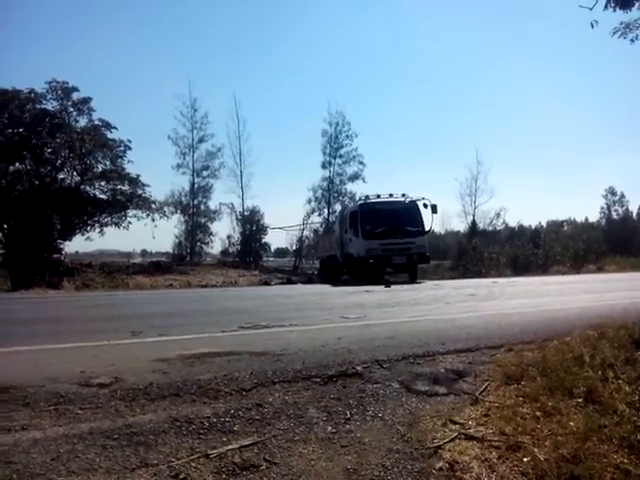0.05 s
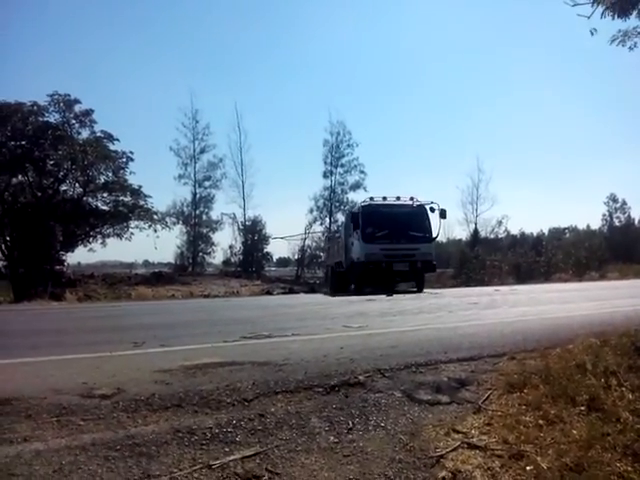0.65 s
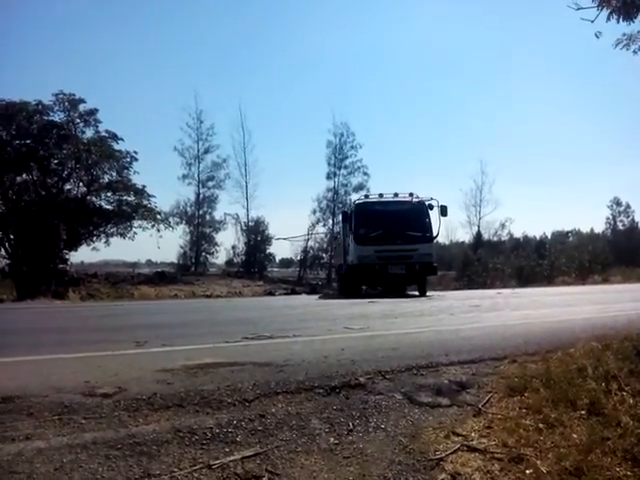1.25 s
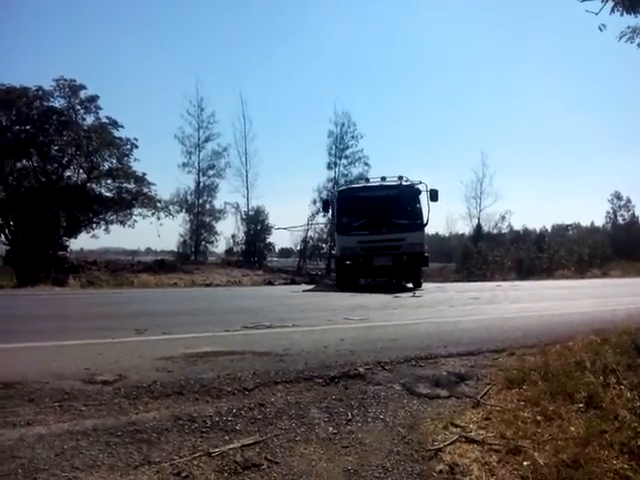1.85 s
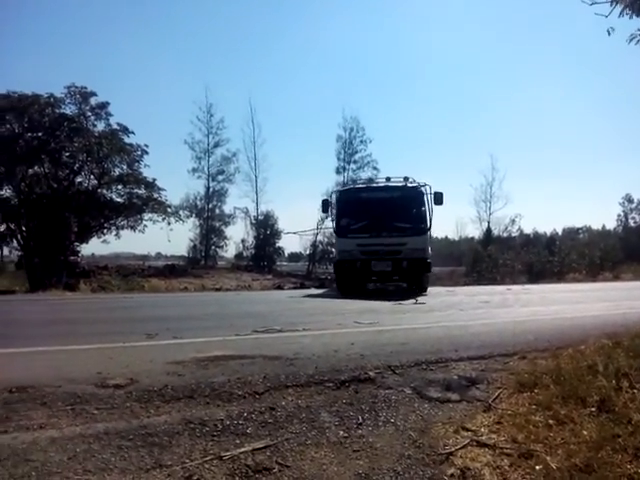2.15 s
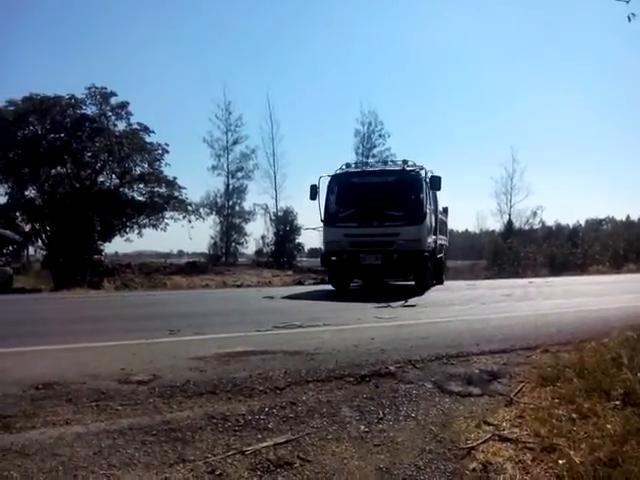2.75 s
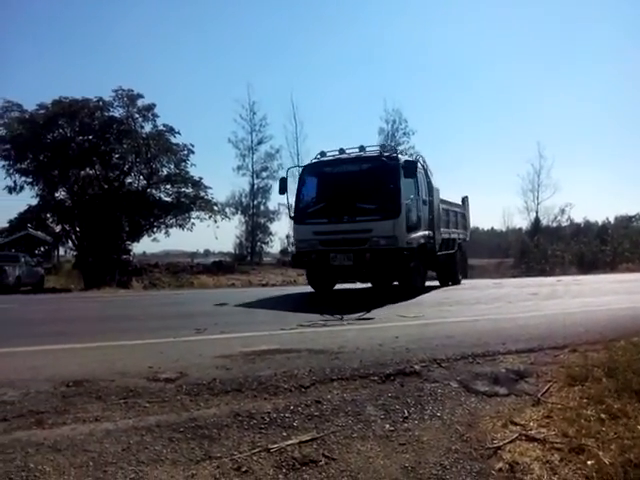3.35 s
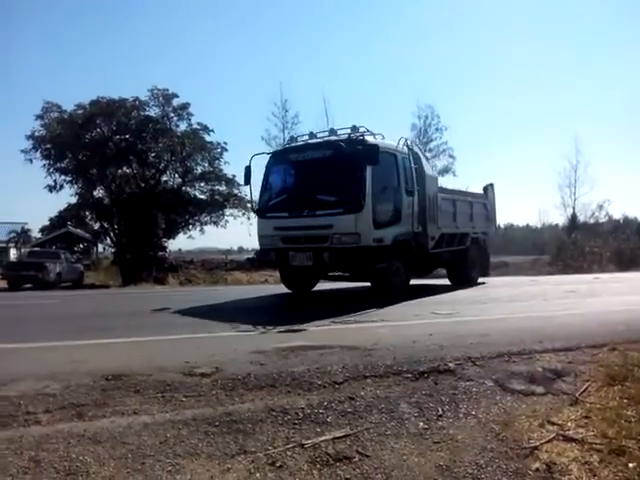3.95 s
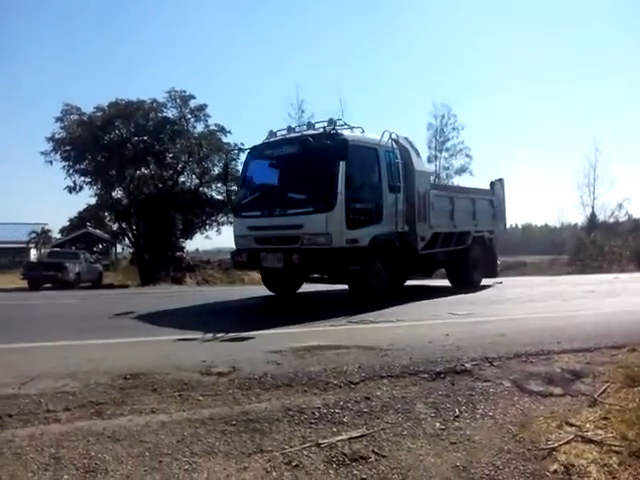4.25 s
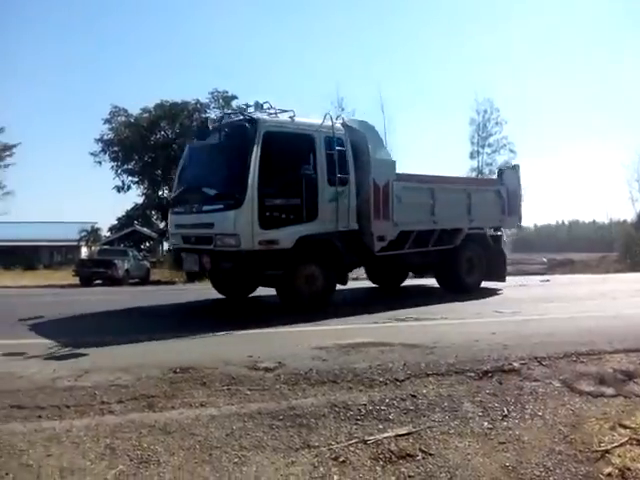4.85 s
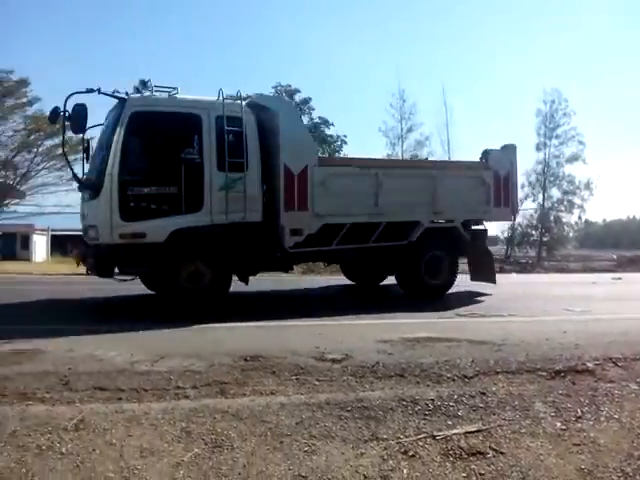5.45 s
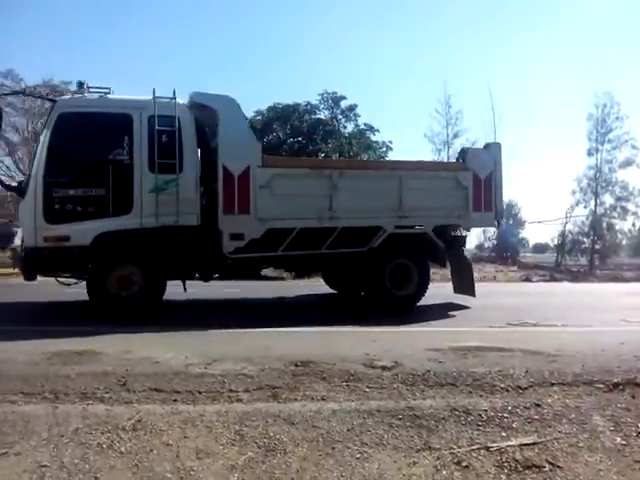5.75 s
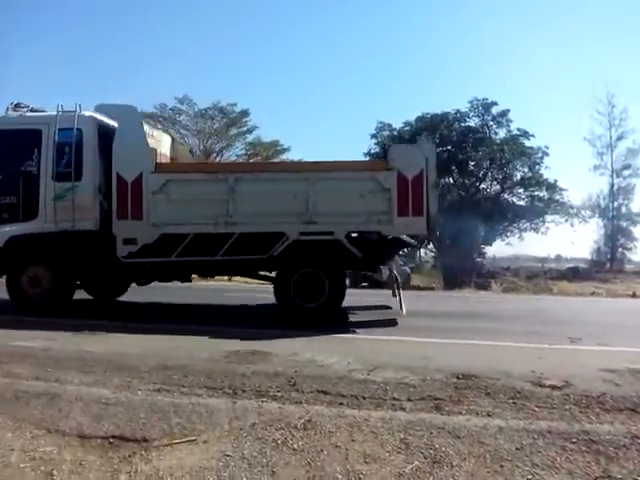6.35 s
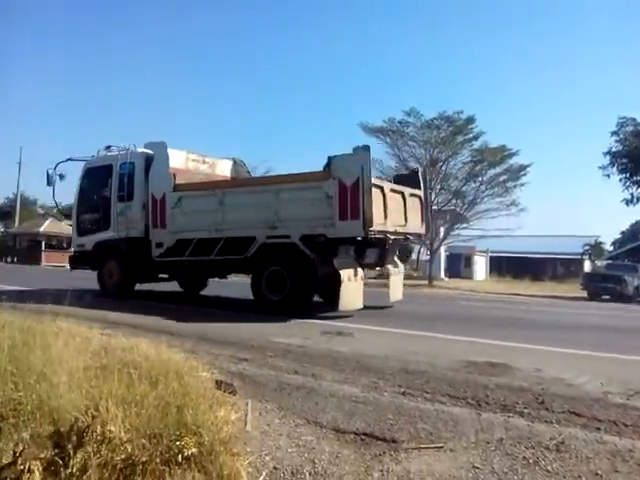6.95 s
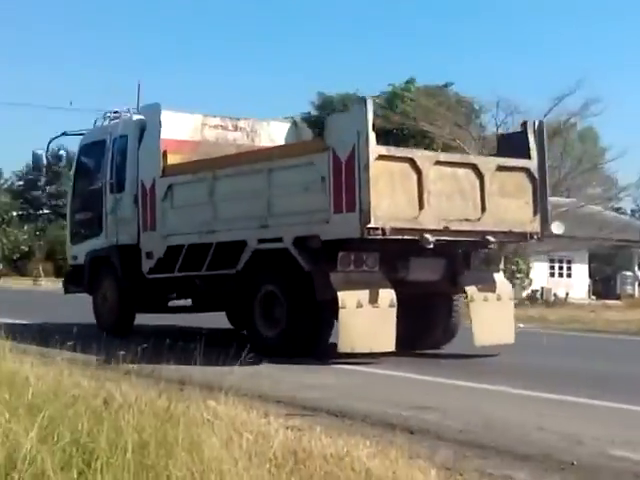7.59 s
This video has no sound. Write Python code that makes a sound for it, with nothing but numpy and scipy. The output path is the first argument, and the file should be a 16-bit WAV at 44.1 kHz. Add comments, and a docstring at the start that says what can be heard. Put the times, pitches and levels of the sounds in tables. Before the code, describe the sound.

Heard from the roadside, a heavy truck approaches, its diesel engine droning and knocking while its steel body clinks now and then. The pitch rises slowly and sinks during a gear change. The exhaust then thumps and growls as the truck accelerates loudly past, a few metres from the microphone. As its tail goes by, the exhaust hisses, the rear gears whine and the revs fall.

```python
"""A six-cylinder diesel dump truck pulls away, changes gear at about 4 s and accelerates past a stereo
microphone on the verge, 4.5 m from the lane. Firings drone through the exhaust, uneven cylinders make
the pipe throb, combustion knocks clatter once a firing and loose steel clinks on the tipper body. Hard
firings boom and the silencer barks as the load comes on. As the tail goes by, gas hisses from the outlet
and the rear gears whine. The loudest peaks clip at full scale."""
import sys
import numpy as np
from scipy import signal
from scipy.fft import rfft, irfft
from scipy.io import wavfile
from scipy.ndimage import uniform_filter1d

SR = 44100
rng = np.random.default_rng(int(sys.argv[2]) if len(sys.argv) > 2 else 0)


def to_wav(sig):
    """Store sig (one row per channel, or 1-D mono) as 16-bit WAV at the path in sys.argv[1].

    Samples outside -1..1 are clipped; the rate is SR.
    """
    pcm = np.clip(np.atleast_2d(sig), -1, 1) * 32767
    pcm = np.round(pcm).astype(np.int16)
    wavfile.write(sys.argv[1], SR, pcm.T)  # frames by channels


N = 336042
T = np.arange(N) / SR
HZ = np.maximum(np.fft.rfftfreq(N, 1 / SR), 1)

# engine speed as firing rate: t/s, f/Hz
FIRING_RATE = [(0, 42.4), (.35, 41.6), (.55, 44.27), (1, 46.92), (2, 47), (2.5, 50.55), (3.42, 63.63),
               (3.55, 58.5), (3.75, 52.27), (4.08, 39.25), (4.3, 41.65), (4.8, 40.66), (5.72, 58.96),
               (6, 67.78), (6.6, 85.28), (6.8, 89.73), (7.15, 70.98), (7.62, 56.2)]
# strength of the exhaust: t/s, drone base level/dB, throb level/dB
EXHAUST_LEVELS = [(0, -16.5, -25), (.3, -22.5, -24.5), (.55, -17.5, -21), (1.5, -16.5, -19),
                  (2.05, -14.3, -18), (2.75, -8.5, -24.5), (3.45, -7.5, -20), (3.75, -11.5, -24),
                  (4, -19, -27.5), (4.35, -9, -17.5), (4.8, -16, -17), (5.05, -10, -14.5), (5.85, -4, -22),
                  (6.3, -4, -13), (6.78, -8, -12), (6.92, -17.5, -12), (7.3, -16, -18), (7.62, -19, -17)]
# exhaust pipe resonances: f/Hz, width/Hz, level/dB
PIPE_MODES = [(109.96, 8.5, 1), (207.4, 5.8, -7.5), (271, 7, -16.5), (338, 19, -22), (362, 11, -27.5)]
# silencer shell resonances: f/Hz, width/Hz, level/dB
SHELL_MODES = [(400.6, 30, 8), (492, 31, 0.5), (621, 37, 5), (710, 35, -30), (880, 68, -41)]
# spectrum of drumming panels: f/Hz, level/dB
PANEL_SPECTRUM = [(280, -8), (375, 1.5), (440, -6), (530, -3), (620, 1), (720, -0.5), (820, 2), (920, -7),
                  (1060, -13.5), (1400, -8.5), (2500, -45)]
# spectrum of fine spray, from injectors or gas jet: f/Hz, level/dB
FIZZ_SPECTRUM = [(3000, -23.5), (4200, 3.5), (5000, 5), (5700, 1.5), (6700, 0), (7400, -6.5), (7900, -26),
                 (8600, -39.5)]
# stereo width at the microphone for all but the gas jet: f/Hz, side minus mid/dB
FRONT_WIDTH = [(100, -32.5), (300, -19), (900, -15.5), (1600, -16), (2700, -9), (3800, -4), (5000, 3),
               (7500, 7.5)]


def undb(db):
    """Decibels to gain."""
    return 10 ** (np.asarray(db) / 20)


def unit(x):
    """Scale to rms 1."""
    return x / np.std(x)


def curves(table):
    """The columns of a table, joined by straight lines in time."""
    s, *columns = np.transpose(table)
    return [np.interp(T, s, c) for c in columns]


def response(points):
    """Gain per frequency from points of f/Hz, level/dB."""
    hz, db = np.transpose(points)
    return undb(np.interp(np.log(HZ), np.log(hz), db))


def colour(x, gain):
    """Minimum-phase filter with the given gain per frequency."""
    cepstrum = irfft(np.log(gain + 1e-6), N)
    cepstrum[1:N // 2] *= 2
    cepstrum[N // 2 + 1:] = 0
    impulse = irfft(np.exp(rfft(cepstrum)), N)[:N // 16]
    return signal.fftconvolve(x, impulse)[:N]


def noise():
    """White noise."""
    return rng.standard_normal(N)


def wander(rate_hz):
    """Smooth random drift of spread 1."""
    return unit(irfft(rfft(noise()) / (1 + (HZ / rate_hz) ** 4), N))


def steady(x, span_s=.23):
    """Hold the running rms at 1."""
    return x / np.sqrt(uniform_filter1d(x * x, int(span_s * SR)) + 1e-4 * np.var(x))


def strikes(times, sizes):
    """Single pushes at the given times."""
    x = np.zeros(N)
    np.add.at(x, np.clip(np.asarray(times) * SR, 0, N - 1).astype(int), sizes)
    return x


def fade(x, decay_s):
    """Give each push an exponential tail."""
    return signal.lfilter([1], [1, -np.exp(-1 / (decay_s * SR))], x)


def ring(pushes, modes):
    """Damped resonances ring after each push."""
    t = T[:SR // 2]
    tail = sum(undb(db) * np.exp(-np.pi * width * t) * np.sin(2 * np.pi * hz * t)
               for hz, width, db in modes)
    return signal.fftconvolve(pushes, tail)[:N]


def puffs(fired, depth, decay_s, scatter_db):
    """Envelope that surges at every firing."""
    sizes = undb(scatter_db * rng.standard_normal(len(fired)))
    surge = fade(strikes(fired, sizes), decay_s)
    depth = np.clip(depth, 0, 1)
    return steady(1 - depth + depth * steady(surge))


def swell(peak_s, peak_db, rise_db_per_s, fall_db_per_s):
    """Level in dB that climbs and sinks as a source sweeps past the microphone."""
    return peak_db - np.maximum(rise_db_per_s * (peak_s - T), fall_db_per_s * (T - peak_s))


def ports(source, width, direct):
    """Direct sound reaches the microphone's left port first; scattered sound differs between ports."""
    mid = source()
    difference = 1j * np.sqrt(direct) * rfft(mid) + np.sqrt(1 - direct) * rfft(source())
    side = irfft(difference * response(width), N)
    return np.array([mid + side, mid - side])


def pedal(travel_s=.091):
    """Depth of the accelerator, 0-1."""
    # one press for each gear: start/s, end/s, depth/0-1
    presses = [(.35, 3.5, .65), (4.85, 6.8, 1)]
    return sum(depth * np.clip(np.minimum(T - start, end - T) / travel_s + .5, 0, 1)
               for start, end, depth in presses)


def nearness(nearest_s=6.36, speed_m_s=5.83, lane_m=4.5):
    """Lane distance over the engine's distance from the microphone: 1 as it passes."""
    return lane_m / np.hypot(lane_m, speed_m_s * (T - nearest_s))


def outlet_in_view(turn_s=(5.91, 6.56)):
    """0 while the cab hides the exhaust outlet from the microphone, 1 once it is in view."""
    return np.interp(T, turn_s, [0, 1])


def exhaust_drone(crank, rate, jitter_cycles=.007, waver_db=.45, outlet_lift_share=.23):
    """Harmonics of the firing rate swell as they cross the pipe's resonances."""
    # harmonics from the first up: level in front/dB, level facing the outlet/dB, full-throttle gain/dB
    harmonics = [(-4, -3.5, 4), (0.5, -9, 1.5), (-11, -2, 0), (-18, -25.5, 16), (-13, -37.5, 8)]
    # how the pipe lifts a harmonic that sweeps through it: f/Hz, gain/dB
    pipe_lift = [(42, -19), (48, -25.5), (60, -21.5), (80, -11), (95, -2.5), (112, -1), (138, -2.5),
                 (160, -3.5), (185, -10.5), (207, -2.5), (222, -3.5), (238, -18.5), (280, -18),
                 (440, -28.5)]
    lift_hz, lift_db = np.transpose(pipe_lift)
    base_db, _ = curves(EXHAUST_LEVELS)
    rear, full_throttle = outlet_in_view(), pedal() ** 4
    unsteady_crank = crank + jitter_cycles * wander(51)
    drone = 0
    for k, (front_db, rear_db, throttle_db) in enumerate(harmonics, 1):
        hz = k * rate
        lift = np.interp(np.log(hz), np.log(lift_hz), lift_db)
        db = base_db + full_throttle * throttle_db
        db += (1 - rear) * (front_db + lift) + rear * (rear_db + outlet_lift_share * lift)
        db += waver_db * (k / 2) ** 2 * wander(20)
        pipe_shift = hz * (hz - 80) / 270 ** 2  # phase in cycles
        drone += undb(db) * np.cos(2 * np.pi * (k * unsteady_crank + pipe_shift))
    return np.sqrt(2) * drone


def exhaust_throb(fired, load, pulling_scatter=.045, stumble=.39, outlet_scatter=.11):
    """The differences between cylinders ring the pipe and burble at the outlet."""
    # relative surplus push of each cylinder in firing order: into the pipe, at the outlet
    cylinders = [(0.37, 0.69), (0.19, -0.14), (-0.041, 0.33), (0.17, 0.57), (-0.022, 0.081), (-0.044, -0.2)]
    # the silencer passes little above its cut-off: f/Hz, gain/dB
    silencer = [(380, -4.5), (460, -16), (900, -26)]
    # spectrum of the burble at the outlet: f/Hz, level/dB
    burble_spectrum = [(28, -59), (48, -23.5), (80, -1), (135, 15), (185, 2), (240, 1), (325, 0),
                       (390, -19), (470, -36), (900, -71.5)]
    firing_order = np.arange(1, len(fired) + 1) % len(cylinders)
    surplus = (cylinders - np.mean(cylinders, axis=0))[firing_order]
    chance = rng.standard_normal((len(fired), 2))
    # off the throttle the firings stumble
    scatter = np.where(np.interp(fired, T, load) > .1, pulling_scatter, stumble)
    pipe_pushes = strikes(fired, surplus[:, 0] + scatter * chance[:, 0]) + .0028 * noise()
    outlet_pushes = strikes(fired, surplus[:, 1] + outlet_scatter * chance[:, 1]) + .01 * noise()
    pipe = steady(colour(ring(pipe_pushes, PIPE_MODES), response(silencer)))
    burble = steady(colour(outlet_pushes, response(burble_spectrum)))
    # more comes straight from the outlet under load and when it faces the microphone
    share = np.clip(.65 * outlet_in_view() + 2.6 * load ** 3, .01, .92)
    _, throb_db = curves(EXHAUST_LEVELS)
    return undb(throb_db) * (np.sqrt(1 - share) * pipe + np.sqrt(share) * burble)


def engine_bay(fired, load):
    """Combustion knocks clatter once a firing and drum on the panels; the injectors fizz."""
    # peaks that colour the engine's clatter: f/Hz, half-width/Hz, level/dB
    clatter_peaks = [(1377, 168, -1.5), (1645, 150, 0), (2218, 375, 0.5), (2978, 320, -1.5),
                     (3620, 313, -0.5), (4230, 460, -8.5)]
    # engine clatter from the verge: t/s, base level/dB
    clatter_levels = [(0, -41), (.4, -38.5), (2, -37), (2.55, -33.5), (3.1, -36), (3.5, -31.5), (4, -37),
                      (4.95, -32.5), (5.45, -39), (5.8, -39.5), (6.3, -29), (6.6, -27.5), (7, -32),
                      (7.62, -37.5)]
    clatter_gain = np.sqrt(sum(undb(db) ** 2 / (1 + ((HZ - hz) / width) ** 2) ** 2
                               for hz, width, db in clatter_peaks))
    knock = puffs(fired, depth=.08 + .3 * load, decay_s=.007, scatter_db=3)
    drum = puffs(fired, depth=.12 + .25 * load, decay_s=.008, scatter_db=3)
    # panels and injectors follow the clatter's level and gain close to the microphone
    clatter_db, near = curves(clatter_levels)[0], nearness()
    panel_db = -26 + .36 * clatter_db + 7 * near
    fizz_db = clatter_db - 12 + np.interp(near, [.16, .38], [0, 4.5])

    def sound():
        clatter = undb(clatter_db + 1.5) * unit(colour(knock * noise(), clatter_gain))
        panels = undb(panel_db) * unit(colour(drum * noise(), response(PANEL_SPECTRUM)))
        fizz = undb(fizz_db) * unit(colour(knock * noise(), response(FIZZ_SPECTRUM)))
        return clatter + panels + fizz
    return ports(sound, FRONT_WIDTH, direct=.99)


def body_clinks():
    """Loose steel strikes the tipper body; each clink is one dying tone."""
    # clinks: t/s, f/Hz, level/dB, t60/s
    clinks = [(.208, 2280, -26, 0.032), (.213, 1760, -29, 0.05), (0.297, 3040, -31, .22),
              (.308, 3590, -29, 0.15), (2.441, 4530, -36.5, 0.12), (4.745, 3310, -26.5, 0.1),
              (5.653, 1880, -26.5, 0.07), (5.655, 2210, -29, 0.058)]
    t = T[:SR // 2]
    steel = 0
    for s, hz, db, t60 in clinks:
        tone = 1000 ** (-t / t60) * np.sin(2 * np.pi * hz * t)
        steel += signal.fftconvolve(strikes([s], [undb(db)]), tone)[:N]
    return steel


def hard_firings():
    """A hard firing booms in the pipe, cracks on the silencer shell and spits a burst of noise."""
    # hard firings as the load comes on: t/s, relative boom level/dB, relative crack level/dB
    kicks = [(2.098, -9.5, -43.5), (4.876, -10.5, -27), (5.01, -14, -25.5), (5.141, -7.5, -22.5),
             (5.184, -7.5, -24), (5.205, -18.5, -25.5)]
    # the whole silencer box heaves: f/Hz, width/Hz, level/dB
    box_modes = [(68, 26, -1)]
    s, boom_db, crack_db = np.transpose(kicks)
    boom = ring(strikes(s, undb(boom_db)), PIPE_MODES + box_modes)
    blows = strikes(s, undb(crack_db))
    crack = ring(blows, SHELL_MODES)
    spit = fade(blows, decay_s=.005) * unit(colour(noise(), response(PANEL_SPECTRUM)))
    return undb(-7) * boom + undb(-1) * crack + undb(-2) * spit


def silencer_bark(fired, start_s=4.82, attack_s=.2, hold_s=.53, release_s=.2, turbulence=.11):
    """As second gear takes the load, firings strike the shell and rushing gas makes the panels growl."""
    blows = strikes(fired, undb(rng.standard_normal(len(fired))))
    rush = fade(blows, decay_s=.02) * noise()
    shell = steady(ring(blows + turbulence * rush, SHELL_MODES))
    growl = undb(-3) * steady(colour(rush, response(PANEL_SPECTRUM)))
    age = T - start_s
    attack = np.clip(age / attack_s, 0, 1)
    release = np.exp(-np.maximum(age - attack_s - hold_s, 0) / release_s)
    return undb(-31) * attack * release * (shell + growl)


def gas_jet(fired, load, spray_db=-9.5):
    """The jet at the outlet hisses in puffs once the cab has passed the microphone."""
    # spectrum of the jet's hiss: f/Hz, level/dB
    hiss_spectrum = [(900, -3), (2000, -16.5), (2800, 1.5), (3600, 4), (4200, 2.5), (5000, -5),
                     (6000, -22.5), (8000, -26.5)]
    # stereo width of the jet at the microphone: f/Hz, side minus mid/dB
    jet_width = [(900, -10), (2000, -7), (3200, -3), (4200, -2), (5200, 2), (7000, 6)]
    flow = puffs(fired, depth=.3 * load, decay_s=.0076, scatter_db=5)
    db = swell(peak_s=6.8, peak_db=-23, rise_db_per_s=20.5, fall_db_per_s=13)
    gain = np.sqrt(outlet_in_view()) * undb(db)
    spectrum = np.hypot(response(hiss_spectrum), undb(spray_db) * response(FIZZ_SPECTRUM))
    return ports(lambda: gain * unit(colour(flow * noise(), spectrum)), jet_width, direct=.15)


def gear_whine(peak_s=6.74, pitch_hz=1560, sag_hz_per_s=390, waver=.008):
    """The rear gears whine, falling in pitch as the back of the truck sweeps past."""
    db = swell(peak_s, peak_db=-34.5, rise_db_per_s=100, fall_db_per_s=27) + 2 * wander(40)
    hz = (pitch_hz - sag_hz_per_s * (T - peak_s)) * (1 + waver * wander(60))
    return np.sqrt(2) * undb(db) * np.sin(2 * np.pi * np.cumsum(hz) / SR)


def scene(full_load_hz=82):
    """The truck from the verge; one crankshaft times the drone, throb, clatter, bark and puffs."""
    rate = curves(FIRING_RATE)[0]
    crank = np.cumsum(rate) / SR + .3  # one cycle a firing
    fired = T[1:][np.diff(np.floor(crank)) > 0]  # firing times
    load = pedal() * (rate / full_load_hz) ** 2
    exhaust = exhaust_throb(fired, load) + exhaust_drone(crank, rate)
    truck = exhaust + silencer_bark(fired) + hard_firings() + body_clinks() + gear_whine()
    return ports(lambda: truck, FRONT_WIDTH, direct=.94) + engine_bay(fired, load) + gas_jet(fired, load)


def record(dry, bass_hz=38, ceiling=1.0, top_hz=8300):
    """The microphone colours each side and loses deep bass; peaks clip at full scale; the top is cut."""
    # balance of the microphone's two ports: f/Hz, left minus right/dB
    port_balance = [(60, .6), (150, 1), (300, -.5), (900, 2), (1600, 2), (2700, 1.2), (4650, -3.5),
                    (8000, -2.5)]
    tilt = response(port_balance) ** np.array([[.5], [-.5]])
    bass_cut = 1 / np.sqrt(1 + (bass_hz / HZ) ** 12)
    clipped = np.clip(irfft(rfft(dry) * tilt * bass_cut, N), -ceiling, ceiling)
    return signal.sosfilt(signal.ellip(8, .2, 70, top_hz, fs=SR, output="sos"), clipped)


dry = scene()
out = record(dry)
to_wav(out)
```